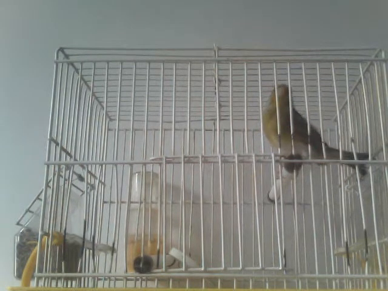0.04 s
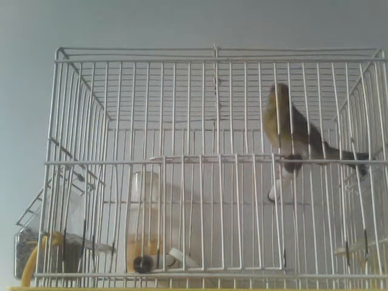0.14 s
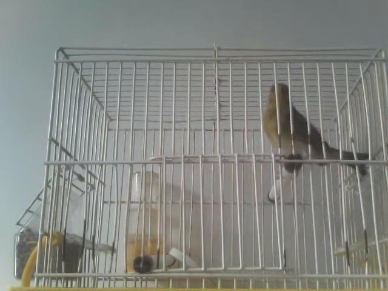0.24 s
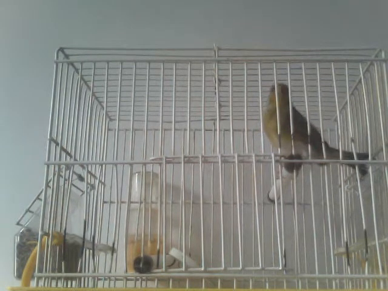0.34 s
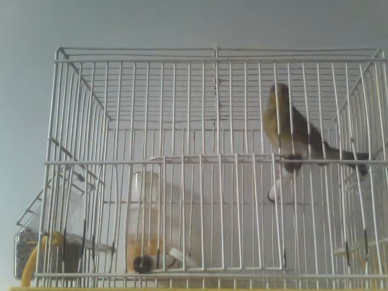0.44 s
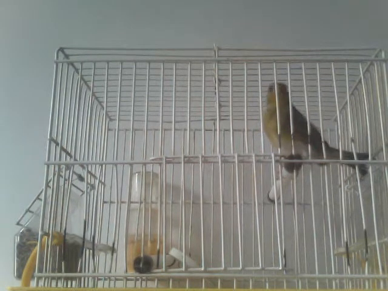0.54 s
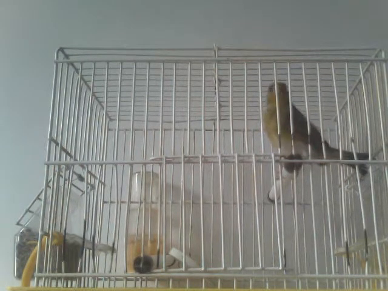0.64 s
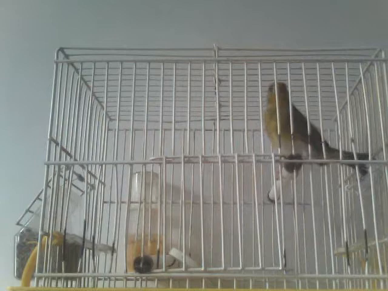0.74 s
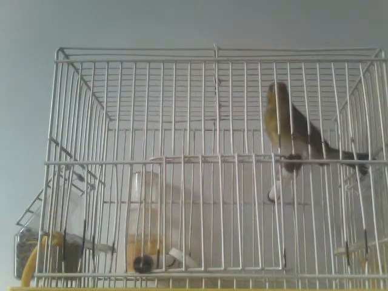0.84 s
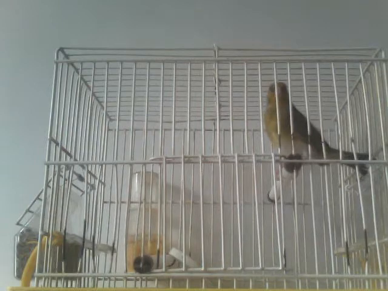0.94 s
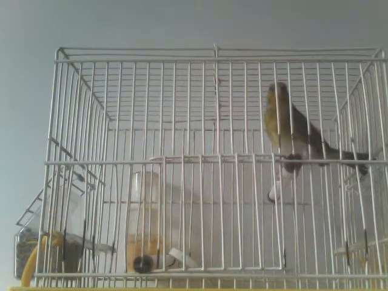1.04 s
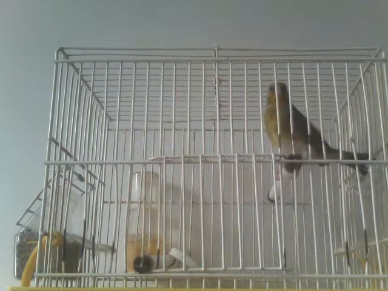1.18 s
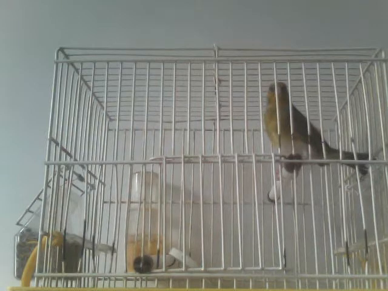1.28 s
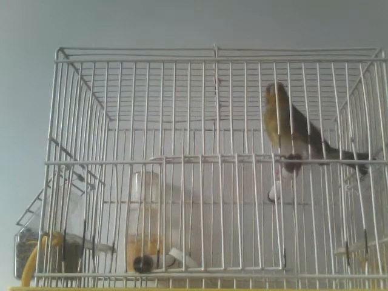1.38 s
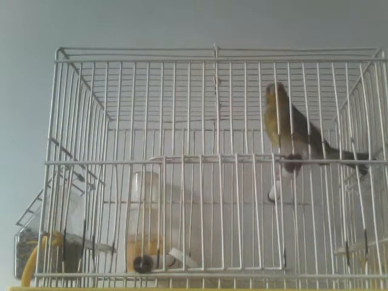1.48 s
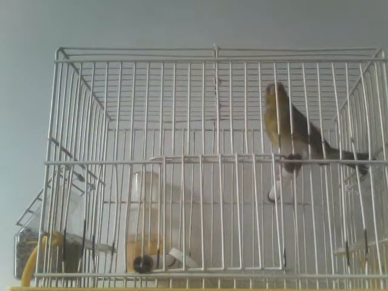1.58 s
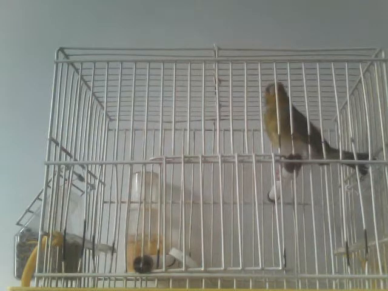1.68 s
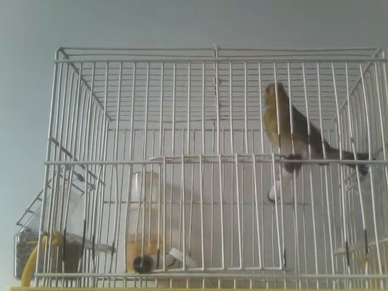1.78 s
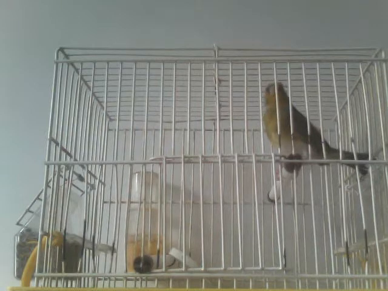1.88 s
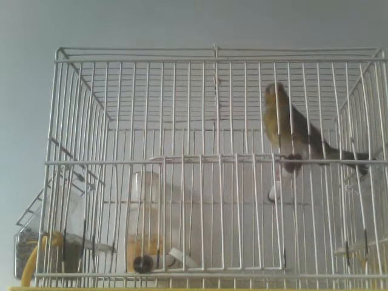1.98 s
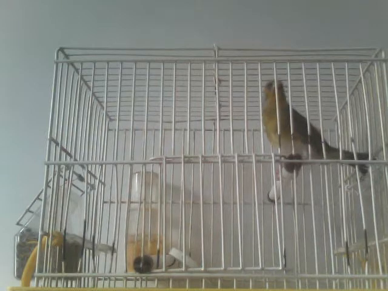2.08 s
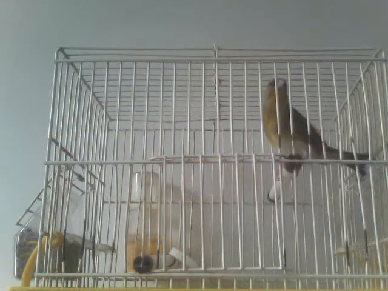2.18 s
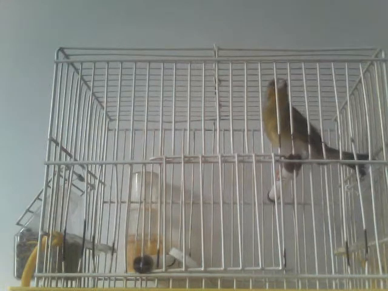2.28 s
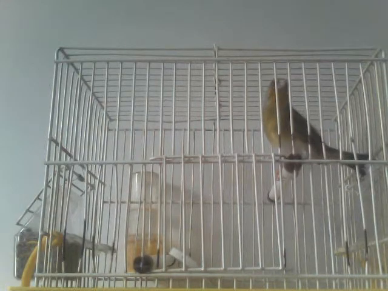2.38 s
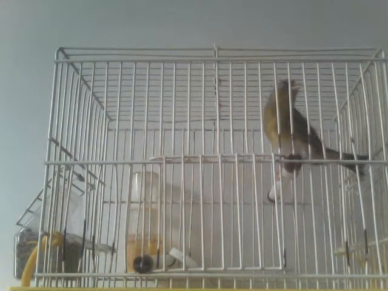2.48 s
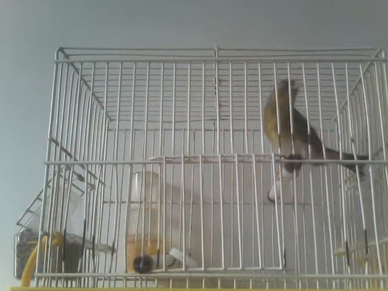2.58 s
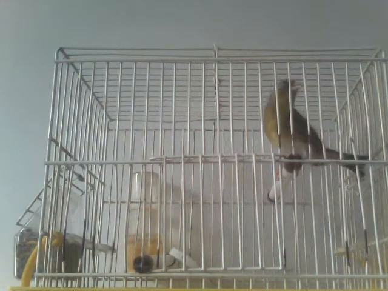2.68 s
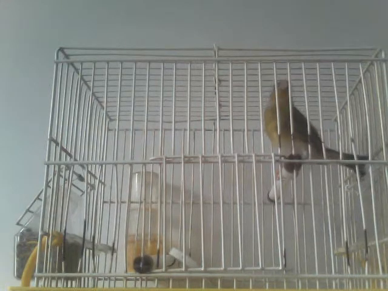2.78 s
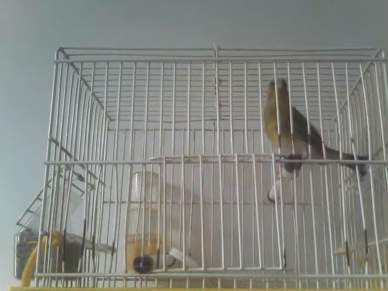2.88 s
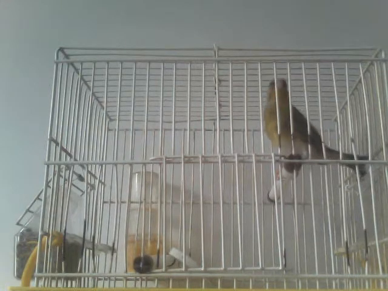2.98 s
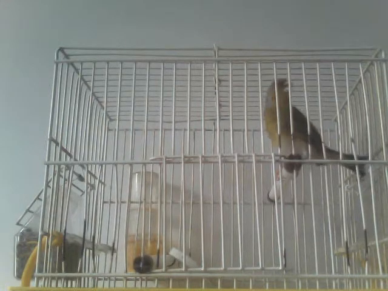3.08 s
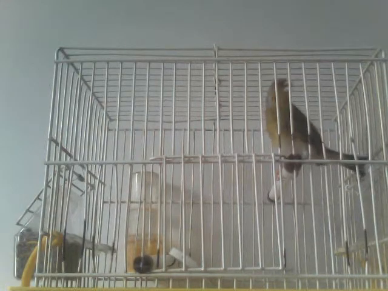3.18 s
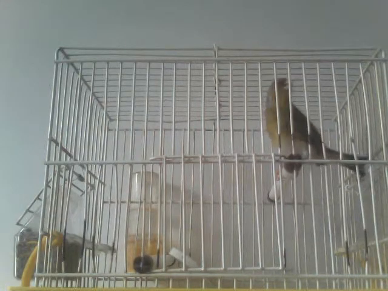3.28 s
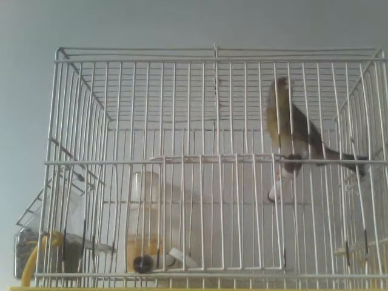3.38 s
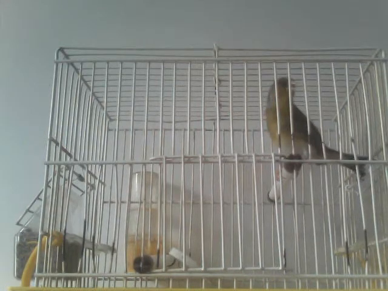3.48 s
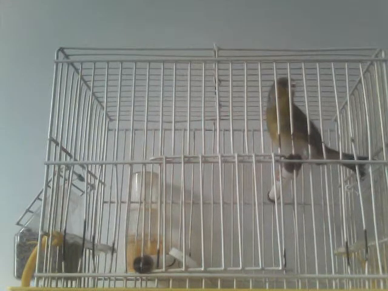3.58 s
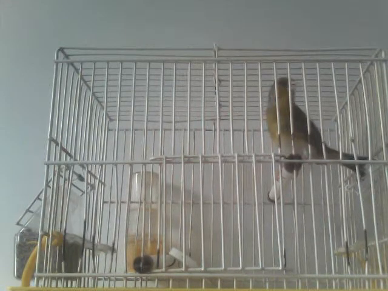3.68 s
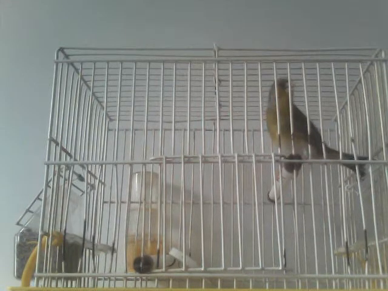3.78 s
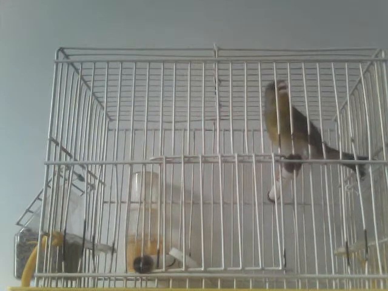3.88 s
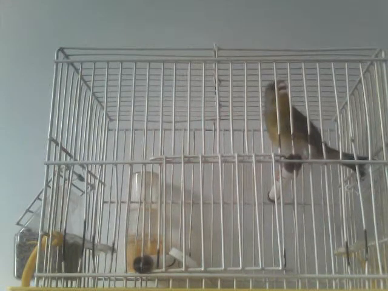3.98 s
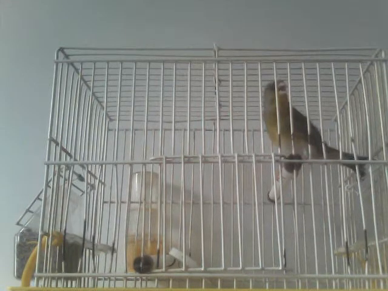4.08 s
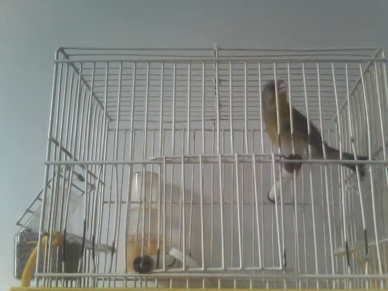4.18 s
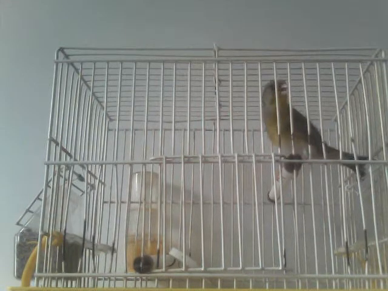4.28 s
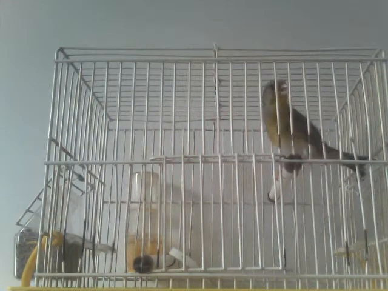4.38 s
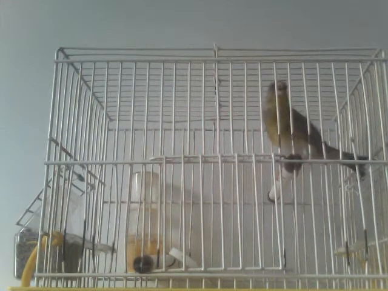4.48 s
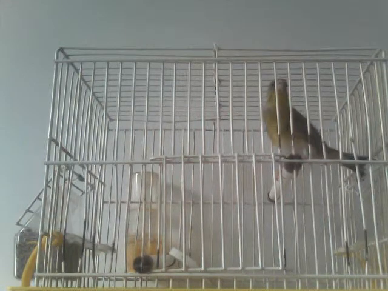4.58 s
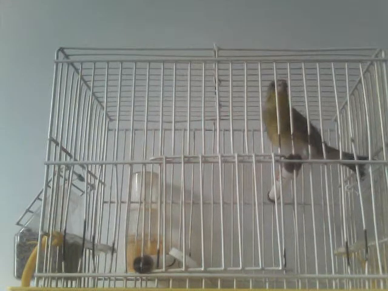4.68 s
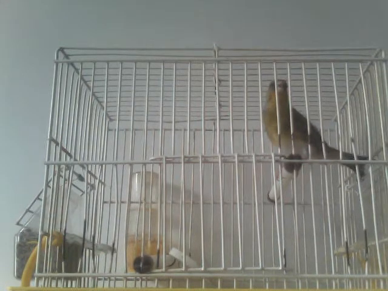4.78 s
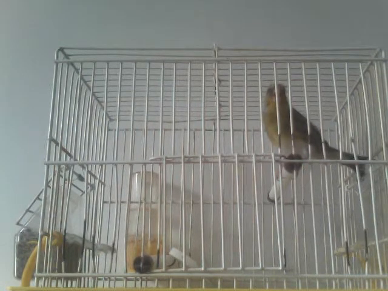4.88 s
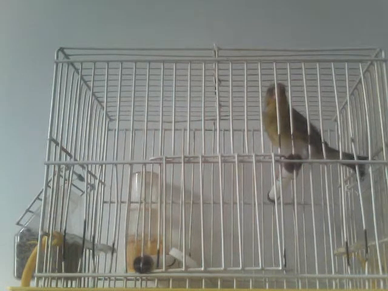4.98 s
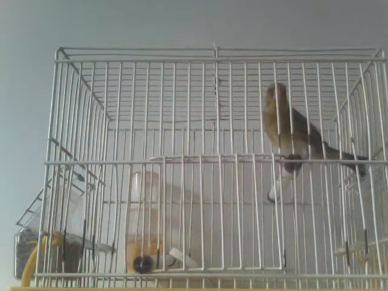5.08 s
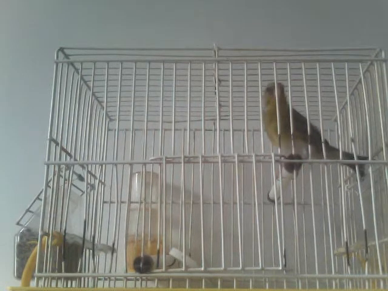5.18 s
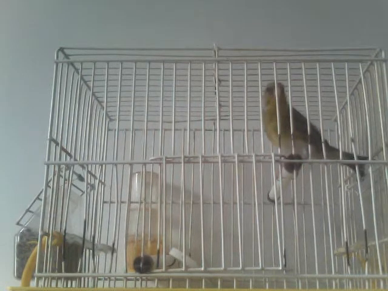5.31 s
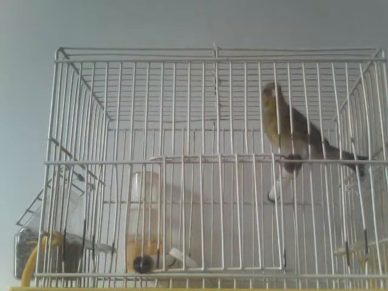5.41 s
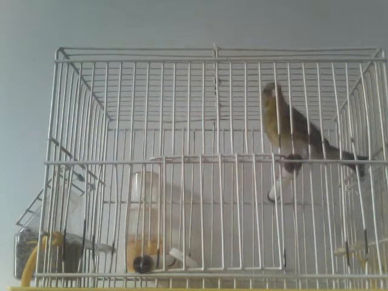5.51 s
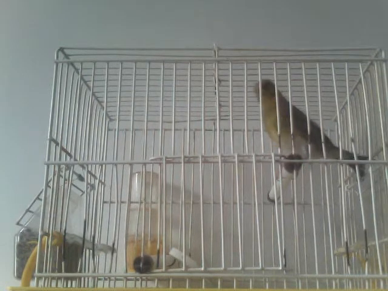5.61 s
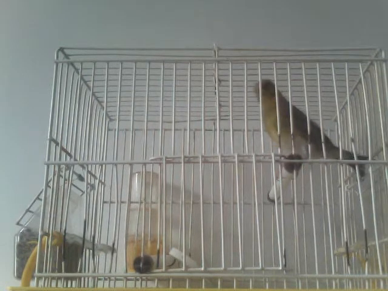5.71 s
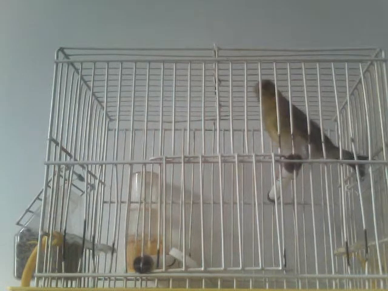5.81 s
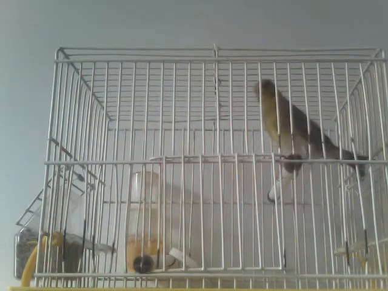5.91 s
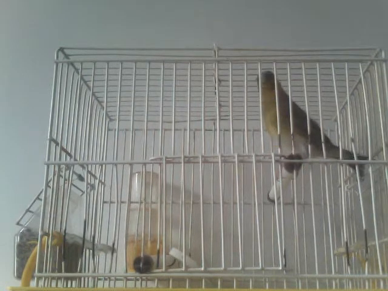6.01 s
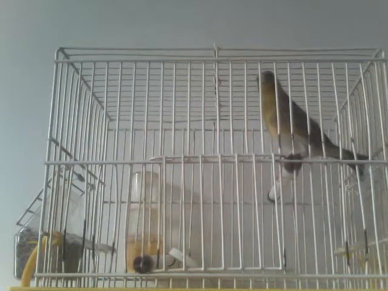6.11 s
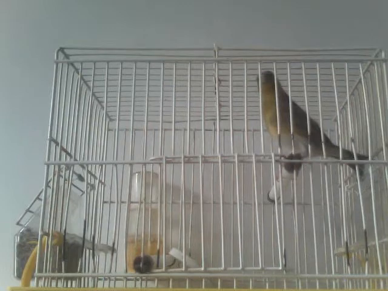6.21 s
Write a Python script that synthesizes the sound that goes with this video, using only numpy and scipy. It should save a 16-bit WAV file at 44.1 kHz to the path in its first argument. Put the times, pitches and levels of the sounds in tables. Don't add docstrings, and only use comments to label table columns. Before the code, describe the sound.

After two quiet seconds of hum and hiss, a caged finch sings four quick double chirps, then five piercing rounds of whistle, buzz and rising note.

```python
import sys
import numpy as np
from scipy import signal
from scipy.fft import rfft, irfft
from scipy.io import wavfile
from scipy.ndimage import uniform_filter1d

SR = 44100
rng = np.random.default_rng(int(sys.argv[2]) if len(sys.argv) > 2 else 0)


def volts(x):
    e = np.asarray(x, float) / 20
    return 10 ** e


def to_wav(s):
    ch = np.atleast_2d(s).T
    pcm = np.round(np.clip(ch, -1, 1) * 32767)
    wavfile.write(sys.argv[1], SR, pcm.astype(np.int16))


N = 275625

VOICE_OVERTONES = {"tuk": [(2, -8), (3, -28.5)], "whip": [(2, -30), (3, -30.5), (4, -31.5)],
                   "whistle": [(2, -37.5), (3, -38)], "rise": [(2, -31), (3, -37.5), (4, -42)],
                   "buzz": [(2, -23.5), (3, -29)], "cheep": [(2, -49)]}


def finch():
    tuk_rule = dict(from_hz=1785, to_hz=2902, settle=.54, attack_db=19, attack=0.43, release_db=3, release=0.18)
    pip_rule = dict(from_hz=3480, to_hz=3430, settle=0.25, attack_db=9, attack=.15, release_db=12, release=.5)
    whip_rule = dict(from_hz=3307, to_hz=5240, settle=0.74, attack_db=8, attack=0.25, release_db=6, release=0.25)
    whistle_rule = dict(from_hz=4040, to_hz=4194.7, settle=0.13, swings=3.06, attack_db=10, attack=0.038, release_db=7.5, release=.07)
    rise_rule = dict(from_hz=3032, to_hz=3332, settle=.24, attack_db=25.5, attack=0.17, release_db=6, release=.22)
    # start_s [s], length_ms [ms], pitch_shift [%], peak_db [dB], swell_db start to end [dB]
    tuk_notes = [
        (2.162, 24.6, 1.5, -28.5, -9),
        (2.407, 27.4, 0.083, -28, -0.5),
        (2.635, 26, .1, -26, 0.1),
        (2.847, 24, .1, -25.5, 5),
    ]
    pip_notes = [
        (2.248, 11, .1, -26, .1),
        (2.489, 9.5, -0.12, -29, .1),
        (2.7183, 8.5, 0.28, -27, .1),
        (2.927, 10, -0.23, -28, 0.12),
    ]
    whip_notes = [
        (2.26, 24.8, -0.35, -11.5, .1),
        (2.5007, 24.03, .1, -8, .1),
        (2.7275, 23.5, .1, -8, .1),
        (2.9387, 24.1, 0.14, -5, .1),
    ]
    opener_notes = [
        (3.075, 153.4, 0.036, -2.5, -2.5),
    ]
    whistle_notes = [
        (3.4964, 147, -0.19, -4.5, 0),
        (3.9032, 155, 0.67, -5, -7.5),
        (4.3221, 149.6, -0.2, -3.5, 1),
        (4.743, 149.3, -0.24, -3, 0.6),
    ]
    rise_notes = [
        (3.372, 61.2, 1, -3, -0.78),
        (3.779, 61.9, 0.39, -2.5, -0.098),
        (4.198, 61, 0.46, -3, -0.031),
        (4.612, 62.7, 0.055, -3, -0.29),
        (5.032, 60.3, 0.48, -3.5, -1),
    ]
    buzz_notes = [
        (3.2750, 78, 0.073, -2.5, 5.5),
        (3.6740, 82.8, .1, -0.8, 1.5),
        (4.093, 82.4, 0.23, 0, 1.4),
        (4.5060, 84.1, -0.09, 0.8, -3),
        (4.926, 83.4, -0.093, -0.6, -2.8),
    ]
    parts = [
        (plain(tuk_rule), tuk_notes, "tuk"),
        (plain(pip_rule), pip_notes, "whip"),
        (plain(whip_rule), whip_notes, "whip"),
        (opener, opener_notes, "whistle"),
        (plain(whistle_rule), whistle_notes, "whistle"),
        (plain(rise_rule), rise_notes, "rise"),
        (buzz, buzz_notes, "buzz"),
    ]
    return sum(sing(shape, notes, VOICE_OVERTONES[voice]) for shape, notes, voice in parts)


def opener(u):
    # share of the length [0-1], pitch_hz [Hz], level_db [dB]
    contour = [
        (0, 5195, -41),
        (.04, 4575, -20.5),
        (0.074, 4190, -17.5),
        (.13, 4394, -6),
        (.36, 4283, -0.5),
        (.6, 4350, -1.5),
        (.9, 4417, -1.5),
        (1, 4340, -4.5),
    ]
    share, hz, db = np.transpose(contour)
    return np.interp(u, share, hz), np.interp(u, share, db)


def buzz(u):
    buzz_rule = dict(from_hz=5760, to_hz=5497, settle=.6, swings=1.13, attack_db=15.5, attack=0.2, release_db=5, release=.11)
    snap_at, snap_takes = 0.72, 0.068
    start_swing_hz, widest_swing_hz, tight_swing_hz = 150, 416, 205
    loose_rate_hz, tight_rate_hz = 233.4, 215
    drop_hz, slide_hz = 89.6, 171
    snap_gain_db, throb_db, throb_lag_rad = 4.5, 1.5, 0.91

    hz, db = spring(u, **buzz_rule)
    tight = np.clip((u - snap_at) / snap_takes, 0, 1)
    rate_hz = loose_rate_hz + (tight_rate_hz - loose_rate_hz) * tight
    uneven = 1 + 0.13 * walk(90)[:len(u)]
    turn = 2 * np.pi * np.cumsum(rate_hz * uneven) / SR

    loose_swing_hz = start_swing_hz + (widest_swing_hz - start_swing_hz) * u / snap_at
    swing_hz = loose_swing_hz + (tight_swing_hz - loose_swing_hz) * tight
    slide = np.clip((u - snap_at) / (1 - snap_at), 0, 1) ** 2
    hz = hz - slide_hz * slide - drop_hz * tight + swing_hz * np.cos(turn)
    db = db - snap_gain_db * (1 - tight) - throb_db * np.cos(turn - throb_lag_rad)
    return hz, db


def plain(rule):
    return lambda u: spring(u, **rule)


def spring(u, from_hz, to_hz, settle, attack_db, attack, release_db, release, swings=0):
    hz = to_hz + (from_hz - to_hz) * np.exp(-u / settle) * np.cos(2 * np.pi * swings * u)
    build_db = -attack_db * np.exp(-u / attack)
    letting_go = np.clip(1 + (u - 1) / release, 0, 1)
    return hz, build_db - release_db * letting_go ** 2


def sing(shape, notes, overtones):
    # pitch_hz [Hz], level_db [dB]
    beak_colour = [(4000, -8), (5400, -7.5), (6600, -14.5), (7600, -8), (8800, -3), (10000, 2.5),
                   (11500, -13), (13000, -3), (14500, -6), (15600, 6)]
    beak_hz, beak_db = np.transpose(beak_colour)
    out = np.zeros((2, N + SR))
    tremor = 0.00045 * walk(70) + 0.0028 * walk(25)
    phase_unrest = 0.54 * walk(220)
    for start_s, length_ms, shift, peak_db, swell_db in notes:
        start = int(start_s * SR)
        i = np.arange(int(length_ms * SR / 1000))
        u = i / len(i)
        hz, db = shape(u)
        hz = hz * (1 + shift / 100 + tremor[start + i])
        phase = 2 * np.pi * np.cumsum(hz) / SR
        upper = 0
        for k, over_db in overtones:
            gain = volts(over_db + np.interp(k * hz, beak_hz, beak_db))
            shake = phase_unrest[(start + k * i) % N]
            upper = upper + gain * np.sin(k * phase + shake)
        edges = np.clip(np.minimum(i / 0.002, i[::-1] / 0.006) / SR, 0, 1)
        envelope = volts(db + peak_db + swell_db * (u - 0.5)) * np.sin(np.pi / 2 * edges) ** 2
        out[:, start + i] += np.array([np.sin(phase), upper]) * envelope
    return out[:, :N]


def walk(rate):
    hold = int(SR / rate)
    steps = np.repeat(rng.standard_normal(N // hold + 1), hold)
    return 1.3 * uniform_filter1d(uniform_filter1d(steps, hold), hold)[:N]


def room(tail_db):
    # delay_ms [ms], level_db [dB]
    near_echoes = [(1.3, -30), (3.1, -17.5), (7.4, -19.5), (10.5, -19), (15.2, -22), (21.5, -16.5)]
    response = volts(tail_db) * tail(build_s=0.0027)
    response[0] = 1
    for k, (delay_ms, db) in enumerate(near_echoes):
        response[int(delay_ms * SR / 1000)] += (-1) ** k * volts(db)
    return response


def tail(build_s):
    # pitch_hz [Hz], t60_s [s], level_db [dB]
    band_decay = [(1500, 0.98, -0.85), (2650, 0.69, 4.5), (3200, 0.55, -1.26), (4200, 0.53, -2),
                  (5100, 0.48, -3.5), (10000, 0.37, -2), (15900, 0.1, -5)]
    t = np.arange(int(0.9 * SR)) / SR
    hz, frames_s, z = signal.stft(rng.standard_normal(len(t)), SR, nperseg=256)
    band_hz, *columns = np.transpose(band_decay)
    t60, db = (np.interp(np.log(hz + 1), np.log(band_hz), c)[:, None] for c in columns)
    decaying = z * volts(db - 60 * frames_s / t60)
    x = signal.istft(decaying, SR, nperseg=256)[1][:len(t)]
    x = x * (1 - np.exp(-(t / build_s) ** 2))
    return x / np.sqrt(np.sum(x ** 2))


def sparrows():
    cheep_rule = dict(from_hz=4640, to_hz=4400, settle=.3, attack_db=10.5, attack=0.032, release_db=8.5, release=1)
    # start_s [s], length_ms [ms], pitch_shift [%], peak_db [dB], swell_db start to end [dB]
    cheep_notes = [
        (3.196, 32, -23.5, -41.5, 0.11),
        (3.272, 11, -22.5, -34.5, 0.085),
        (5.1, 40, -2, -39, .1),
        (5.268, 50, -1, -45, 0.11),
        (5.385, 28, -24.5, -40.5, .1),
        (5.67, 80, -2.5, -43.5, 6),
        (5.836, 59.3, -1.6, -40.5, 0.12),
        (5.945, 41, -24, -50, .1),
        (6.177, 57, -0.5, -42.5, .1),
    ]
    return sing(plain(cheep_rule), cheep_notes, VOICE_OVERTONES["cheep"]).sum(axis=0)


def caller():
    # start_s [s], length_s [s], top_pitch_hz [Hz], level_db [dB], open_throat_hz [Hz], closing_s [s]
    far_calls = [
        (0.076, .27, 1005, -57.5, 3170, 1),
        (1.456, 0.39, 1009, -59.5, 2256, 0.21),
        (5.461, 0.68, 990, -48, 4350, .25),
    ]
    # multiple, level_db [dB]
    far_overtones = [(2, -11.5), (3, -3), (4, 2), (5, 7)]
    shut_hz, throat_width_hz, fade_db = 1770, 280, 9
    t, out = np.arange(N) / SR, 0
    for start_s, length_s, top_hz, db, open_hz, closing_s in far_calls:
        since = np.clip(t - start_s, 0, length_s)
        throat_hz = shut_hz + (open_hz - shut_hz) * np.exp(-since / closing_s)
        climb = 0.02 * np.exp(-since / 0.04)
        sag = 0.15 * np.exp((shut_hz - throat_hz) / 299)
        hz = top_hz * (1 - climb - sag)
        phase = 2 * np.pi * np.cumsum(hz * (1 + 0.0063 * walk(40))) / SR
        edges = np.clip(np.minimum((t - start_s) / 0.066, (start_s + length_s - t) / 0.021), 0, 1)
        for k, reach_db in far_overtones:
            resonance = np.exp(-((k * hz - throat_hz) / throat_width_hz) ** 2 / 2)
            below = 1 / (1 + (k * hz / throat_hz) ** 8)
            level_db = db + reach_db - fade_db * since / length_s + 2.0 + 1.1 * walk(25)
            out = out + edges * (resonance + below) * volts(level_db) * np.sin(k * phase)
    return out


def whine():
    # multiple of the clock, level_db rms [dB]
    clock_lines = [(3, -79), (4, -67), (6, -84.5), (7, -72.5), (8, -61.5)]
    clock_hz, frame_hz, frame_start_s = 1895.6, 30.0, 0.0146
    t = np.arange(N) / SR
    since = ((t - frame_start_s) * frame_hz + 0.5) % 1 - 0.5
    surge = 1 + 2.2 * np.exp(-(since / frame_hz / 0.0006) ** 2)
    lines = sum(volts(db) * np.sqrt(2) * np.sin(2 * np.pi * k * clock_hz * t) for k, db in clock_lines)
    return surge * lines


def hum():
    # pitch_hz [Hz], level_db rms [dB]
    mains_lines = [(50, -31.5), (150, -62.5), (250, -69), (343, -58)]
    t, out = np.arange(N) / SR, 0
    for k, (hz, db) in enumerate(mains_lines):
        out = out + volts(db + 0.54 * k * walk(9)) * np.sqrt(2) * np.sin(2 * np.pi * hz * t)
    return out


def traffic_and_hiss():
    # pitch_hz [Hz], level_db per Hz [dB]
    noise_colour = [(20, -9.5), (60, 1), (100, -2), (160, -2), (220, -5), (400, -2.5), (650, -4.5),
                    (1000, -9.5), (1600, -15), (2500, -19), (4000, -22), (6300, -24), (10000, -25.5),
                    (16000, -26.5)]
    hz, t = np.arange(N // 2 + 1) * SR / N, np.arange(N) / SR
    colour_hz, colour_db = np.transpose(noise_colour)
    colour = volts(np.interp(np.log(hz + 1), np.log(colour_hz), colour_db))
    noise = irfft(rfft(rng.standard_normal(N)) * colour, N)
    noise = noise * volts(-49.5) / np.sqrt(np.mean(noise ** 2))
    traffic = irfft(rfft(noise) / (1 + (hz / 2000) ** 4), N)
    swell_db = 2.5 * np.exp(-((t - 3.65) / 1.4) ** 2 / 2)
    return noise + traffic * (volts(swell_db - np.mean(swell_db)) - 1)


def scene():
    tone, upper = finch()
    near = signal.fftconvolve(tone, room(tail_db=-10.0))[:N]
    unsteady = upper * volts(2.7 * walk(160))
    near += signal.fftconvolve(unsteady, room(tail_db=-1.0))[:N]
    cheeps, calls = sparrows(), caller()
    far = signal.fftconvolve(cheeps + volts(2.0) * calls, tail(build_s=0.0033))[:N]
    direct = volts(-4) * (cheeps + calls)
    return (near + far + direct + traffic_and_hiss() + hum() + whine())[None]


def band_limit(x):
    return signal.sosfilt(signal.butter(12, 16000, fs=SR, output="sos"), x)


def record(dry):
    top_cut = signal.ellip(10, 0.2, 60, 15750, fs=SR, output="sos")
    mix = signal.sosfilt(top_cut, dry)
    return band_limit(mix)


dry = scene()
out = record(dry)
to_wav(out)
```